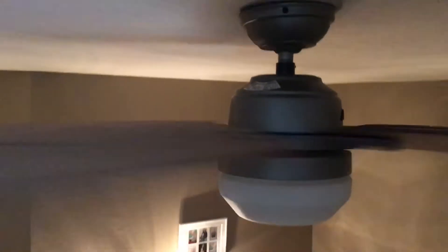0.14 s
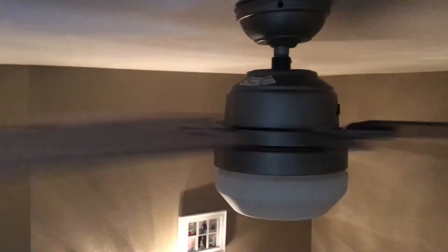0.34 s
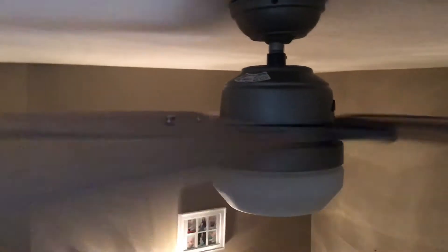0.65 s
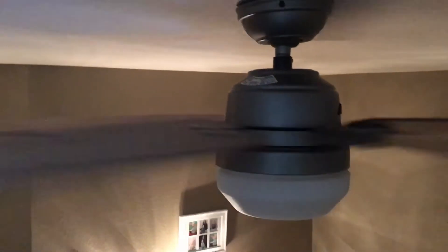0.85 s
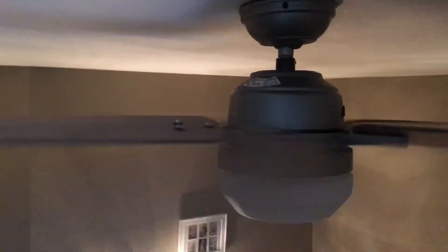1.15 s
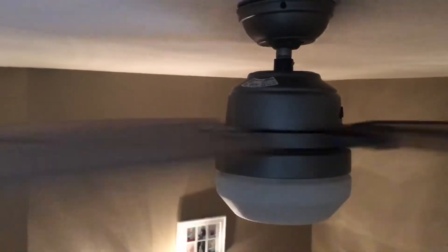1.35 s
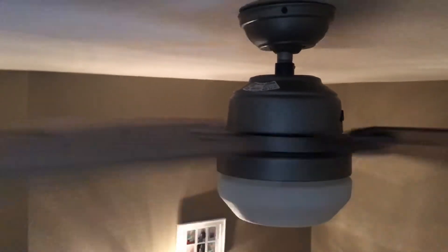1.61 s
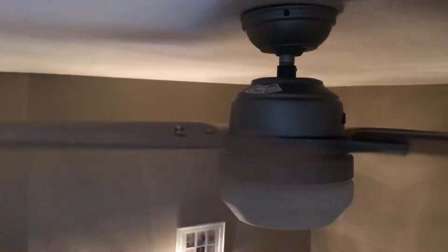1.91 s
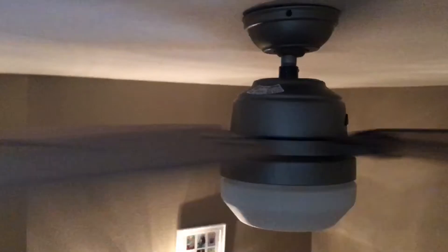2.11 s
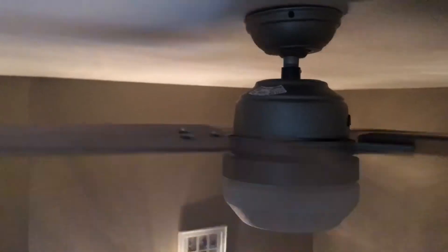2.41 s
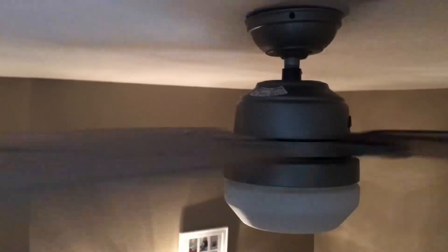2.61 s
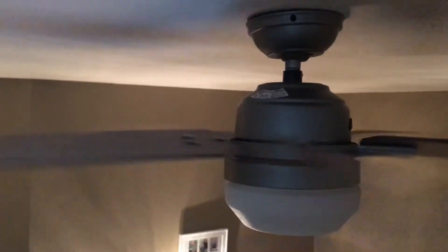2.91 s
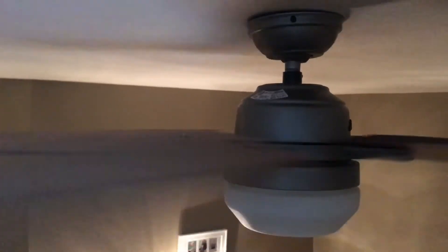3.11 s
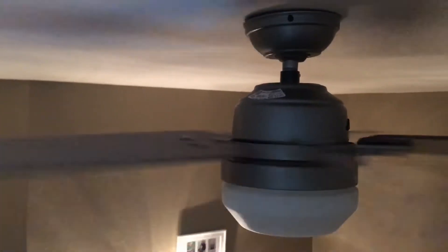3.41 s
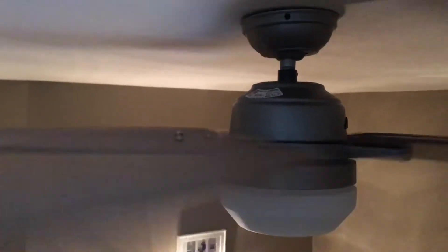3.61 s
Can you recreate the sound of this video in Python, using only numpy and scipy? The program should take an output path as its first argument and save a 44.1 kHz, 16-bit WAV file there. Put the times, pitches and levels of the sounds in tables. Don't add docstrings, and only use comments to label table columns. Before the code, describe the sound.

Close to the blade tips, a ceiling fan runs at constant speed throughout; quick low air pulses and gusty rumbling wake dominate, while a faint mains hum, soft swishes and quiet room hiss sit far beneath.

```python
import sys
import numpy as np
from scipy import signal
from scipy.fft import rfft, irfft
from scipy.io import wavfile
from scipy.ndimage import uniform_filter1d

SR = 44100
rng = np.random.default_rng(int(sys.argv[2]) if len(sys.argv) > 2 else 0)


def volts_from_db(level):
    exponent = np.asarray(level, float) / 20
    return 10 ** exponent


def transcribe(signal):
    frames = np.atleast_2d(signal).T
    limited = np.clip(frames, -1, 1)
    pcm = np.round(limited * 32767).astype(np.int16)
    wavfile.write(sys.argv[1], SR, pcm)


N = 165375
TIME_S = np.arange(N) / SR
BLADE_HZ, FIRST_PASS_S = 11.77, .0708

# mains_multiple, level_db (rms)
MOTOR_HUM = [(2, -64), (4, -64), (6, -77), (10, -81), (16, -90)]
# pitch_hz, width_hz, level_db (rms)
HOUSING_RINGS = [(284.4, 7, -69.5), (357.7, 18, -72.5), (479.5, 6, -76.5), (1107, 6.4, -94),
                 (3050, 40, -102)]
# pitch_hz, density_db (per Hz)
DRAUGHT_COLOUR = [(400, -6), (520, 5.5), (620, 2.5), (750, -7)]
# pitch_hz, density_db (per Hz)
HISS_COLOUR = [(800, -6.5), (2000, 4), (3300, 1), (4400, -1), (6000, -2), (9000, -4), (12000, -7),
               (15500, -8.5)]
# start_s, wake_db, push_db
GUSTS = [(0, -3, 0), (.22, -3, -1.5), (.38, 2, 0), (.68, 1, -1), (.98, -1, 2), (1.3, 3, 0),
         (1.47, -1, -1.5), (1.8, -2, 0), (2.17, 1, -1), (2.36, -2, 0), (2.65, 0, -1), (2.85, 1, 1),
         (3.05, -1, 1), (3.22, 0, 0), (3.5, 1.5, 1.5), (3.64, -2, 1), (3.75, 4, 0)]
# centre_s, extra_wake_db, extra_swish_db
AIR_KNOTS = [(.41, 0.5, 2), (.75, 0.5, 2), (.84, 0, 2), (1.26, 0.5, 2.5), (2.45, 1.5, 2.5),
             (2.55, 1.5, 0.5), (2.64, 2.5, 0), (2.79, 2.5, 3), (2.88, 2, 2), (3.39, -1, 3), (3.47, 1, 4),
             (3.73, 2, 0)]
# pitch_hz, density_db (per Hz)
WAKE_COLOUR = [(25, 2), (55, 1.5), (100, -4.5), (170, 0.5), (260, -6), (350, -8.5), (465, -13), (510, -30)]
# pitch_hz, density_db (per Hz)
SWISH_COLOUR = [(600, -7), (780, -3), (1050, -0.5), (1300, -4.5), (1600, -7), (2300, -15), (3300, -19),
                (6000, -29)]
# pitch_hz, width_hz, depth_db
BODY_DIPS = [(2700, 720, -3), (4910, 470, -3.5), (7630, 800, -2.5), (10430, 620, -5)]


def slow_drift(rate_hz):
    hold = int(SR / rate_hz)
    steps = np.repeat(rng.standard_normal(N // hold + 1), hold)
    return 1.31 * uniform_filter1d(uniform_filter1d(steps, hold), hold)[:N]


def resonant_noise(centre_hz, width_hz):
    f = np.fft.rfftfreq(N, 1 / SR) + 1e-6
    gain = 1 / (1 + (2 * (f - centre_hz) / width_hz) ** 2)
    ring = irfft(rfft(rng.standard_normal(N)) * gain, N)
    return ring / np.std(ring)


def motor():
    mains_hz = 59.975
    out = 0
    for multiple, level_db in MOTOR_HUM:
        phase = 2 * np.pi * (multiple * mains_hz * TIME_S + rng.random())
        out = out + volts_from_db(level_db + slow_drift(3)) * np.sqrt(2) * np.sin(phase)
    for pitch_hz, width_hz, level_db in HOUSING_RINGS:
        out = out + volts_from_db(level_db) * resonant_noise(pitch_hz, width_hz)
    return out


def turbulent_air(colour, level_db, swell_db, flicker_db):
    pitch_hz, density_db = np.array(colour).T
    octave = np.log2(pitch_hz)
    at = np.log2(np.fft.rfftfreq(N, 1 / SR) + 1e-6)
    white = rfft(rng.standard_normal(N))
    outside = np.clip(np.maximum(octave[0] - at, at - octave[-1]), 0, 4)
    tilt = volts_from_db(np.interp(at, octave, density_db) - 30 * outside)
    out = 0
    for middle in np.arange(4, 14.6, .5):
        share = np.cos(np.pi * np.clip(at - middle, -.5, .5)) ** 2
        out = out + irfft(white * tilt * share, N) * volts_from_db(flicker_db * slow_drift(12))
    out = out * volts_from_db(swell_db)
    return out * volts_from_db(level_db) / np.std(out)


def still_air():
    draught = turbulent_air(DRAUGHT_COLOUR, -73, 0.31 * slow_drift(3), 0.73)
    hiss = turbulent_air(HISS_COLOUR, -78.5, 0.39 * slow_drift(4.05), 0.2)
    return draught + hiss


def blade_pulses():
    pulse_s, lead_share = .0056, 1.09
    pulse_db, scatter_db, jitter_s = -37.9, .6, .0005
    luck = rng.standard_normal((int(N / SR * BLADE_HZ) + 3, 2))
    out = 0
    for k, (size, late) in enumerate(luck):
        centre_s = FIRST_PASS_S + (k - 1) / BLADE_HZ + jitter_s * late
        u = (TIME_S - centre_s) / pulse_s
        out = out - volts_from_db(pulse_db + scatter_db * size) * (1 + lead_share * u) * np.exp(-u ** 2 / 2)
    start_s, _, push_db = np.array(GUSTS).T
    return out * volts_from_db(np.interp(TIME_S, start_s, push_db))


def pass_swing_db(lag_s, depth_db, scatter_db, sharpness):
    turn = (TIME_S - FIRST_PASS_S - lag_s) * BLADE_HZ
    bump = np.exp(sharpness * (np.cos(2 * np.pi * turn) - 1))
    luck = rng.standard_normal(int(N / SR * BLADE_HZ) + 4)
    return (2 * depth_db + scatter_db * luck[np.round(turn).astype(int) + 2]) * bump


def knot_swell_db(extra_db):
    knot_s = .014
    centre_s = np.array(AIR_KNOTS)[:, 0]
    return sum(db * np.exp(-((TIME_S - s) / knot_s) ** 2 / 2) for s, db in zip(centre_s, extra_db))


def wake():
    start_s, gust_db, _ = np.array(GUSTS).T
    swell_db = 0.64 * np.interp(TIME_S, start_s, gust_db) + knot_swell_db(np.array(AIR_KNOTS)[:, 1])
    swing_db = pass_swing_db(lag_s=.006, depth_db=4.3, scatter_db=1.2, sharpness=.8)
    return turbulent_air(WAKE_COLOUR, -52, swell_db + swing_db, 1.6)


def swish():
    swell_db = knot_swell_db(np.array(AIR_KNOTS)[:, 2])
    swing_db = pass_swing_db(lag_s=0, depth_db=1.7, scatter_db=.5, sharpness=1.1)
    return turbulent_air(SWISH_COLOUR, -73, swell_db + swing_db, .5)


def scene():
    return (motor() + still_air() + blade_pulses() + wake() + swish())[None]


def low_pass(x):
    return signal.sosfilt(signal.butter(12, 15150, fs=SR, output="sos"), x)


def record(dry):
    f = np.fft.rfftfreq(N, 1 / SR)
    body_db = sum(depth_db * np.exp(-(2 * (f - hz) / width_hz) ** 2) for hz, width_hz, depth_db in BODY_DIPS)
    notched = irfft(rfft(dry) * volts_from_db(body_db), N)
    low_cut = signal.butter(4, 41, "high", fs=SR, output="sos")
    mix = signal.sosfilt(low_cut, notched)
    return low_pass(mix)


dry = scene()
out = record(dry)
transcribe(out)
```